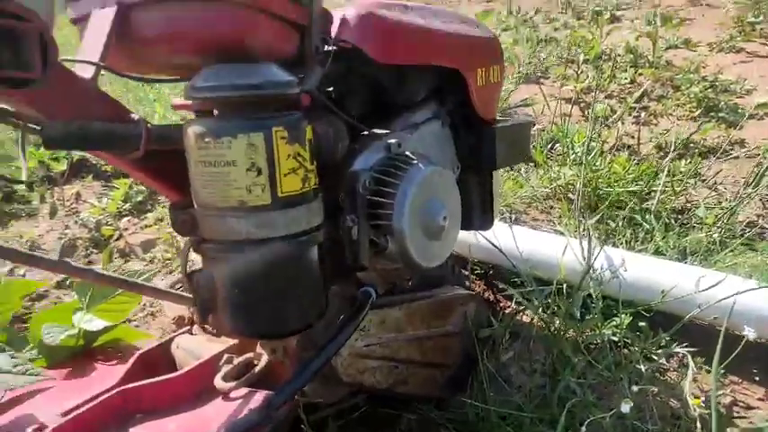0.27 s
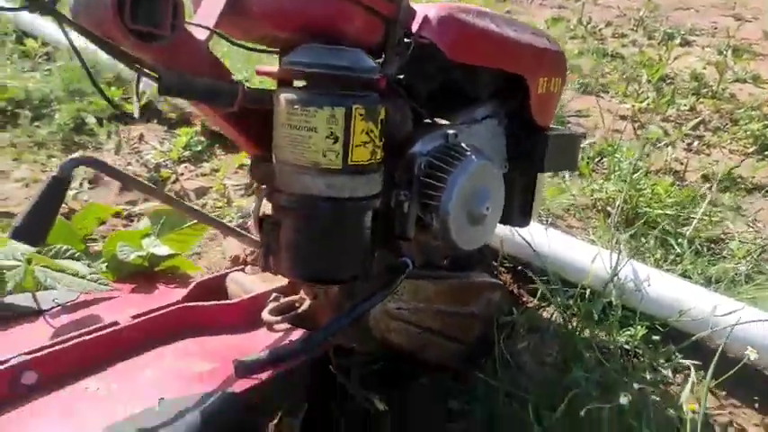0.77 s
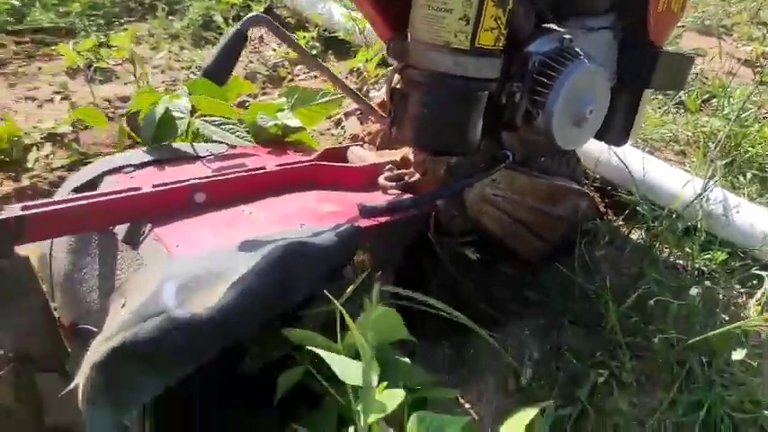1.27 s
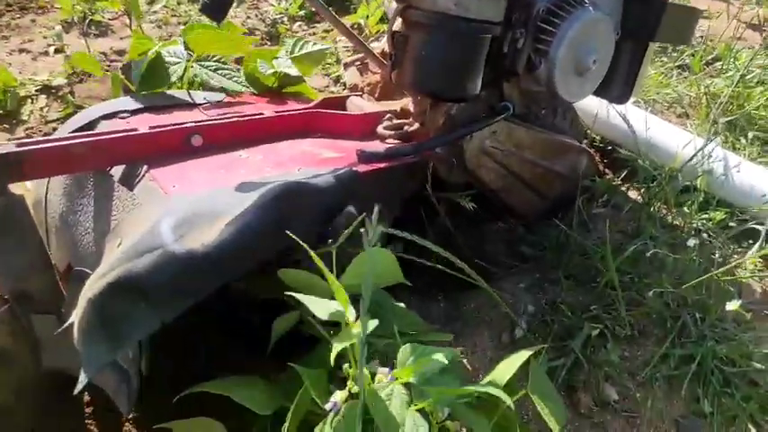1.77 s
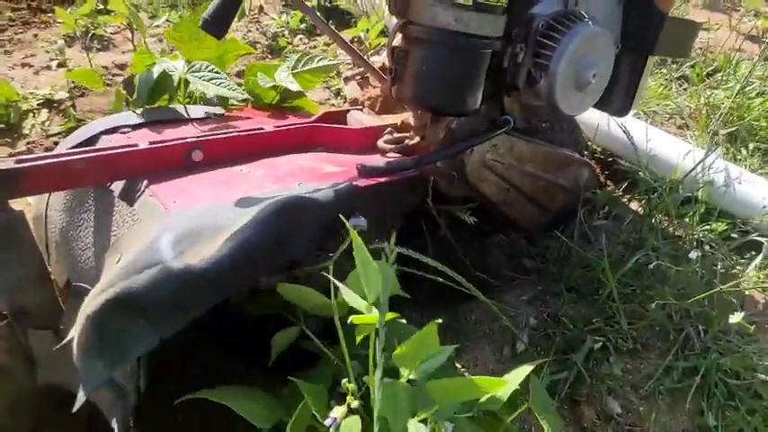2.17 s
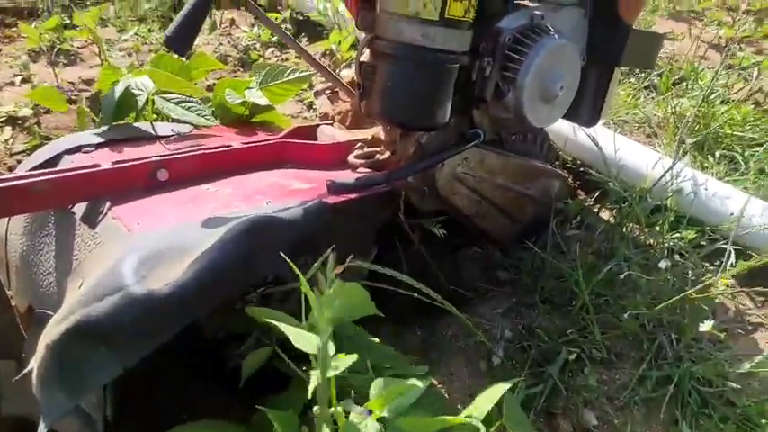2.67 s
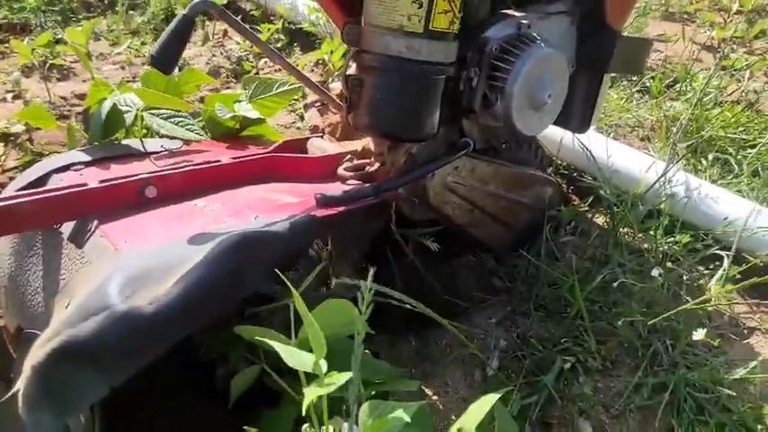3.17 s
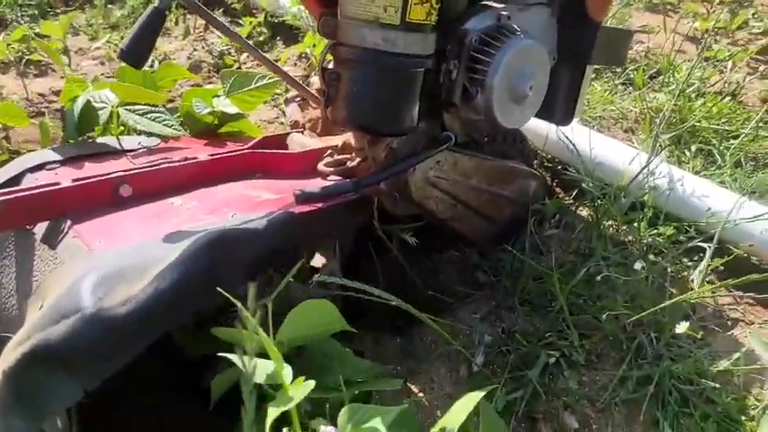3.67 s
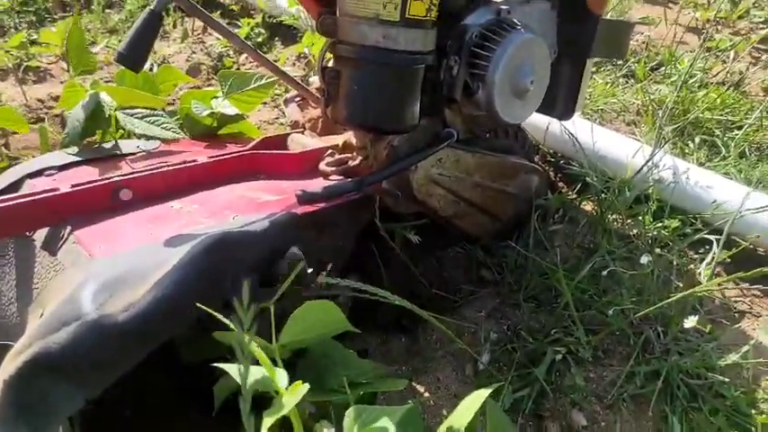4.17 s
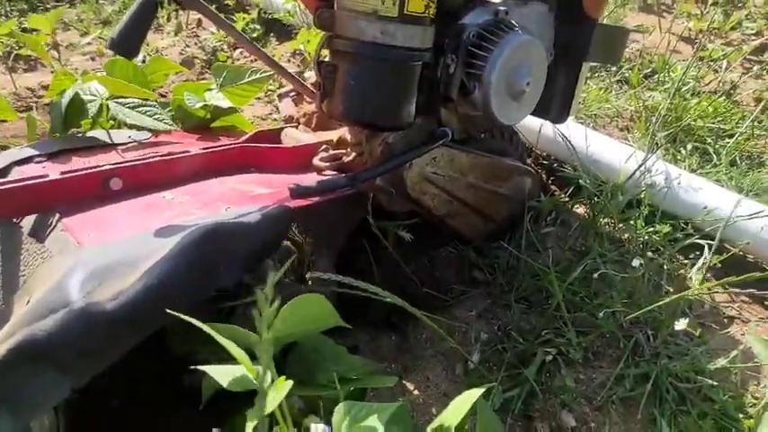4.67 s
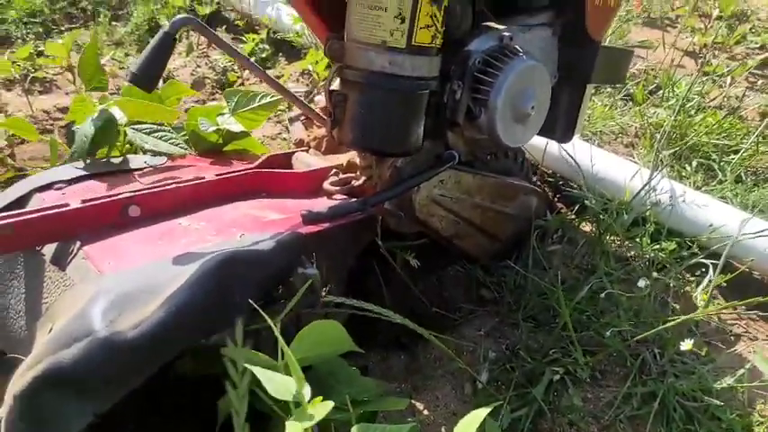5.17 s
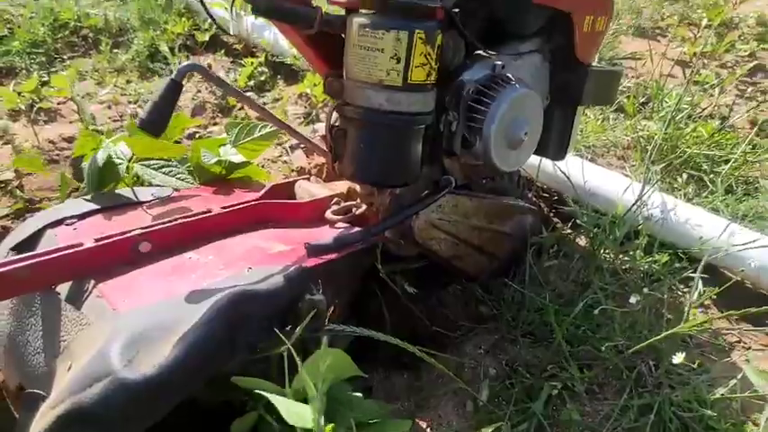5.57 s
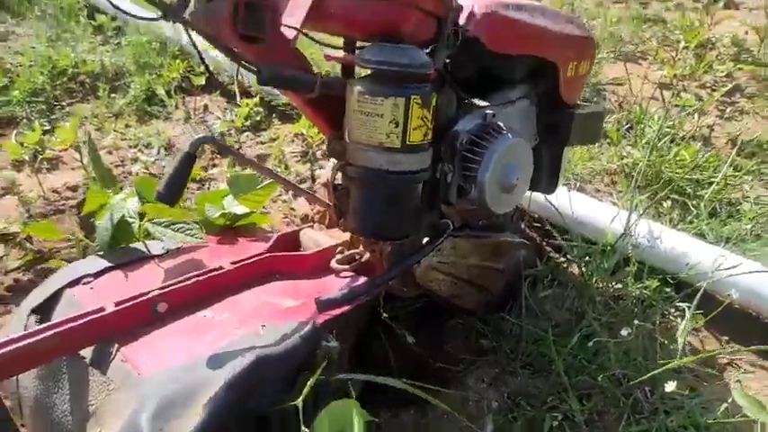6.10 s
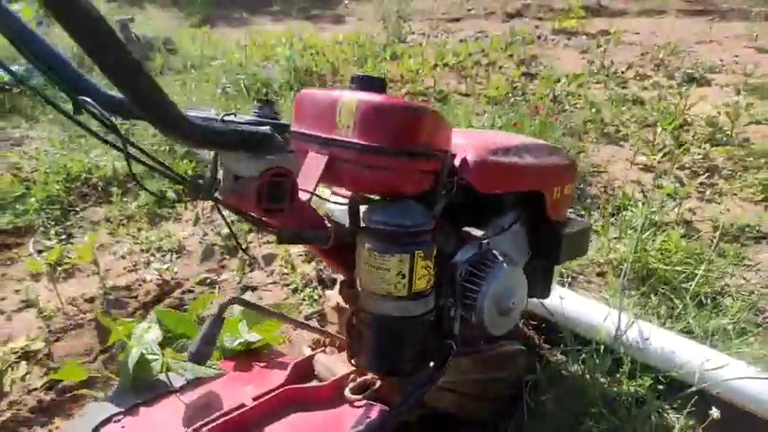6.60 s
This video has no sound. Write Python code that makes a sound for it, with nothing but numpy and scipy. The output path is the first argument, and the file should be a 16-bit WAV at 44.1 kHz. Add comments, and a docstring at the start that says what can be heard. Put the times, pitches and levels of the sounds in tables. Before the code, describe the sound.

Close, dry chatter of a small garden engine with jingling metal covers and low exhaust hum, dropping to a slower idle with distinct knocks.

```python
"""A single-cylinder walk-behind tiller works close by in an open field: filtered noise and struck modes
follow one crankshaft as block knocks, cover jingle and exhaust, over a hum of summed cosines and uneven chuffs.
A sharp metallic clank comes early; near 1.3 s a gust of low noise swells over the breeze, then dies slowly.
Around 4 s the engine slows and the muffler whines in two falling glides of wavering tone.
It then idles with knocks apart, a faint held note, and harder knocks, most cover ticks falling on or near them."""
import sys
import numpy as np
from scipy import signal
from scipy.fft import rfft, irfft, next_fast_len
from scipy.io import wavfile
from scipy.ndimage import uniform_filter1d, minimum_filter1d

SR = 44100
rng = np.random.default_rng(int(sys.argv[2]) if len(sys.argv) > 2 else 0)


def digitize_waveform(pressure):
    """Quantize a signal to 16-bit integers and store it at the path in sys.argv[1].

    Rows of a 2-D input are taken as channels; values are limited to [-1, 1].
    """
    field = np.atleast_2d(pressure).T
    bounded = np.clip(field, -1, 1)
    quanta = np.round(bounded * 32767).astype(np.int16)
    wavfile.write(sys.argv[1], SR, quanta)


N = 301640
TIME = np.arange(N) / SR
SIZE = next_fast_len(N, real=True)
BINS = np.fft.rfftfreq(SIZE, 1 / SR)

# engine speed: time_s, firings_hz
FIRING = [(0.0, 46.47), (0.37, 46.03), (1.27, 46.54), (1.69, 44.77), (2.12, 45.74), (3.24, 44.36),
          (3.92, 41.63), (4.32, 34.91), (4.99, 31.06), (5.43, 31.3), (5.74, 30.89), (6.21, 31.39),
          (6.84, 31.12)]
FAST_HZ, IDLE_HZ = 36.5, 31  # at or above: working; at or below: idling


def crank():
    """Engine cycles since the start, one firing each, and how far the engine has sunk to idle (0-1)."""
    rate_hz, = curves(FIRING)
    cycles = np.cumsum(rate_hz) / SR
    idle = np.clip((FAST_HZ - rate_hz) / (FAST_HZ - IDLE_HZ), 0, 1)
    return cycles, idle


# block colour, relative: freq_hz, work_left_db, work_right_db, idle_left_db, idle_right_db
BLOCK = [(840, -6, -11, -11.5, -19), (930, -2, -6, -3.5, -11.5), (1130, -2.5, -7.5, 0, -9),
         (1280, -4.5, -10.5, -7, -13), (1520, -4, -12, -6, -17), (1680, -5.5, -12.5, -7.5, -19.5),
         (2000, -7, -13, -11, -21), (2450, -10, -14, -14, -22), (2900, -15, -18, -18, -25),
         (3400, -19, -21, -22, -26), (4000, -30, -29, -33, -35), (4500, -28, -28, -33, -33),
         (5000, -29, -26, -33, -31)]


def block(cycles, idle):
    """Slap, combustion knock and rebound ring the block over valve-gear clatter; at idle knocks stand apart."""
    slaps = blows(cycles, peak=-0.08, rise=0.03, decay=0.08, uneven_db=1.5, between=0)
    knocks = blows(cycles, peak=0.11 + 0.05 * idle, rise=0.06, decay=0.27, uneven_db=0.9,
                   between=0.6 - 0.32 * idle)
    rebounds = blows(cycles, peak=0.29 + 0.04 * idle, rise=0.03, decay=0.09, uneven_db=1.5, between=0)
    force = np.sqrt(knocks ** 2 + (0.55 * rebounds) ** 2 + (0.35 * slaps) ** 2)
    # powers of force: ringing follows the blows sharply, clatter and grit more evenly
    ringing = rattle(force ** 1.4, low_hz=950, high_hz=1480, ring_s=0.003, hits_per_s=585, count=8)
    clatter = rattle(force ** 0.72, low_hz=1600, high_hz=4300, ring_s=0.004, hits_per_s=60, count=22)
    grit = force ** 0.68 * rng.standard_normal((2, N)) * amp(1.2 * wander(800))
    drive = grit + amp(3) * ringing + amp(3) * clatter
    return radiate(drive * amp(0.7 * wander(12)), BLOCK, idle, skirt_db=47)


# cover colour, relative: freq_hz, work_left_db, work_right_db, idle_left_db, idle_right_db
COVERS = [(5200, -22, -20, -25, -24), (5800, -22, -14, -25, -23), (6400, -21, -13, -18, -15),
          (6950, -21.5, -14.5, -28.5, -20.5), (7500, -13, -8, -14, -8), (7950, -10.5, -9.5, -11.5, -9.5),
          (8400, -7.5, -11.5, -6.5, -10.5), (9000, -13.5, -18.5, -18.5, -25.5), (9500, -19, -23, -22, -31),
          (10400, -27, -28, -32, -36), (13000, -31, -32, -39, -42), (15300, -37, -37, -50, -50)]


def covers(cycles, idle):
    """Each knock makes thin covers and cooling fins tick, then jingle."""
    ticks = blows(cycles, peak=0.09 + 0.04 * idle, rise=0.012, decay=0.05, uneven_db=3, between=0)
    shakes = blows(cycles, peak=0.09 + 0.05 * idle, rise=0.045, decay=0.36, uneven_db=1.8,
                   between=0.95 - 0.68 * idle)
    jingle = rattle(shakes, low_hz=6200, high_hz=9200, ring_s=0.004, hits_per_s=30, count=22)
    hiss = np.hypot(0.45 * shakes, 0.42 * ticks) * rng.standard_normal((2, N))
    return radiate((hiss + jingle) * amp(1.2 * wander(12)), COVERS, idle, skirt_db=108)


# exhaust colour, relative: freq_hz, work_left_db, work_right_db, idle_left_db, idle_right_db
EXHAUST = [(96, -17.5, -8.5, -17, -17), (166, -10, -11.5, -4.5, -17.5), (237, -9, -10, -4, -6.5),
           (342, -13.5, -14, -16, -16.5), (442, -6, -7.5, -2, -11), (513, -5.5, -8.5, -10.5, -8),
           (563, -7.5, -5, -1.5, -6), (693, -2.5, -12, -4.5, -14), (744, -9.5, -5.5, -15, -8)]


def exhaust(cycles, idle):
    """Gas rushes steadily through the muffler, swelling slightly about four tenths of a cycle after each knock."""
    puffs = blows(cycles, peak=0.53, rise=0.12, decay=0.19, uneven_db=1.5, between=2.6)
    return radiate(puffs * rng.standard_normal((2, N)), EXHAUST, idle, skirt_db=39.5)


# exhaust hum: order (multiple of firing rate), work_db, idle_db
ORDERS = [(1, -42, -54), (2, -40, -44), (3, -36, -39.5), (4, -33.5, -36.5), (5, -47, -35), (6, -45, -45)]
EXHAUST_OPENS_CYCLES = 0.72  # share of the cycle at which the pulse leaves


def hum(cycles, idle):
    """Lowest orders of the exhaust pulses, smeared by the muffler, a little out of step at the two ports."""
    turn = cycles - EXHAUST_OPENS_CYCLES + 0.003 * wander(8)
    tone = 0
    for order, work_db, idle_db in ORDERS:
        level = amp(work_db + idle * (idle_db - work_db) + wander(9))
        skew = np.array([[1], [-1]]) * 0.06 / np.sqrt(order)
        smear = 0.14 * (order - 4) * (order - 5)
        tone = tone + level * np.cos(2 * np.pi * (order * turn + skew - smear))
    return np.sqrt(2) * tone * amp([[0.5], [-0.5]])


# uneven exhaust chuffs: near_s (peak falls at the nearest exhaust opening), relative_db, firings (in a row)
CHUFFS = [(0.142, -25, 1), (0.275, -23, 1), (0.405, -20, 1), (0.535, -18, 2), (0.644, -21, 2),
          (0.776, -24, 1), (0.926, -18, 1), (1.014, -21, 2), (1.119, -28, 1), (1.25, -20, 1),
          (1.504, -19, 1), (1.641, -17, 2), (1.796, -16, 1), (1.909, -16, 2), (1.995, -20, 1),
          (2.106, -16, 2), (2.238, -21, 1), (2.369, -22, 1), (2.456, -20, 1), (2.633, -15.5, 1),
          (2.766, -17, 2), (2.901, -20, 1), (3.079, -18.5, 2), (3.214, -22.5, 2), (3.374, -17, 2),
          (3.511, -15, 1), (3.769, -15, 2), (3.915, -19, 1), (4.035, -15, 3), (4.217, -14, 1),
          (4.417, -12, 1), (4.594, -15, 2), (4.967, -24, 1), (5.418, -27, 1), (5.575, -17, 1),
          (5.706, -13.5, 1), (5.899, -17, 1), (5.996, -18, 1), (6.218, -18, 1), (6.441, -17, 1)]
CHUFF_HALF_WIDTH_S, CHUFF_SAG_HZ_PER_S = 0.0105, 1900
CHUFF_WORK_HZ, CHUFF_IDLE_HZ = 193, 168  # pitch at the peak


def chuffs(cycles, idle, offset_db=-5):
    """Some firings gulp more gas and boom in the muffler as the valve opens, sinking in pitch, lower at idle."""
    out = np.zeros(N)
    offsets = np.arange(-SR // 40, SR // 40)
    age_s = offsets / SR
    envelope = np.exp(-(age_s / CHUFF_HALF_WIDTH_S) ** 2)
    for near_s, relative_db, firings in CHUFFS:
        at = round(near_s * SR)
        peak_hz = CHUFF_WORK_HZ + idle[at] * (CHUFF_IDLE_HZ - CHUFF_WORK_HZ)
        turns = (peak_hz - CHUFF_SAG_HZ_PER_S * age_s / 2) * age_s
        boom = amp(relative_db + offset_db) * envelope * np.cos(2 * np.pi * turns)
        first = np.round(cycles[at] - EXHAUST_OPENS_CYCLES) + EXHAUST_OPENS_CYCLES  # nearest opening
        for k in range(round(firings)):
            out[np.searchsorted(cycles, first + k) + offsets] += boom
    return out * amp([[0.7], [-0.7]])


# muffler whines, two falling glides and a held note; one path each of: time_s, pitch_hz, relative_db
WHINES = [
    [(3.55, 668, -48), (3.61, 650, -27), (3.72, 615, -30), (3.82, 590, -26.5), (3.88, 550, -25),
     (3.95, 530, -48)],
    [(3.9, 600, -48), (3.96, 608, -27), (4.02, 612, -25), (4.07, 568, -22), (4.13, 550, -27),
     (4.2, 540, -24.5), (4.28, 560, -30), (4.4, 555, -48)],
    [(4.4, 550, -42), (4.55, 560, -35), (5.2, 563, -44), (5.4, 567, -32), (6.2, 565, -32), (6.45, 563, -42),
     (6.84, 563, -44)],
]


def whine(cycles, path):
    """A rough, wavering tone near the muffler's resonance, throbbing once a cycle."""
    pitch_hz, relative_db = curves(path)
    inside = 1.0 * (TIME > path[0][0]) * (TIME < path[-1][0])
    sounding = uniform_filter1d(inside, SR // 100)
    throb = 1 + 0.6 * np.cos(2 * np.pi * (cycles - EXHAUST_OPENS_CYCLES))
    tone = np.cos(2 * np.pi * np.cumsum(pitch_hz + 5 * wander(40)) / SR) * throb
    return unit(tone) * sounding * amp(relative_db - 1 + 2.5 * wander(22)) * amp([[1], [-1]])


# sharp metallic ticks and clanks from the covers, at idle mostly on or near harder knocks: start_s, relative_db
CLANKS = [(0.3336, -7), (2.7117, -11.5), (4.882, -14), (4.9447, -17), (5.009, -21), (5.137, -12),
          (5.331, -26), (5.619, -20), (5.651, -19), (6.038, -16.5), (6.069, -21), (6.103, -25),
          (6.1345, -23), (6.581, -19), (6.677, -26), (6.7417, -21)]


def cover_clanks():
    """Sharp blows ring the covers; each is a burst of decaying noise in their idle colour."""
    return strikes(CLANKS, COVERS, decay_s=0.011, offset_db=-6)


# firings that knock harder at idle: start_s, relative_db
KNOCKS = [(4.882, -8), (4.914, -16), (5.011, -22), (5.364, -7), (5.423, -4), (5.556, -17), (5.846, -4),
          (6.037, -15), (6.134, -4.5), (6.198, -19), (6.742, -18)]


def hard_knocks():
    """Some idle firings hit the block harder; each adds decaying noise in its colour."""
    return strikes(KNOCKS, BLOCK, decay_s=0.008, offset_db=-7.5)


# wind spectrum, relative: freq_hz, level_db
WIND = [(15, 11), (30, 12.5), (55, 11), (90, 9.5), (140, -1)]
BREEZE_DB, GUST_DB = -41.5, -28
GUST_PEAK_S, GUST_RISE_S, GUST_FALL_S = 1.27, 0.14, 1


def wind():
    """Turbulent rumble at the microphone ports, swelling with the gust."""
    rumble = colour(spread(rng.standard_normal((2, N))), spectra(WIND, skirt_db=10.5))
    age_s = TIME - GUST_PEAK_S
    gust = np.exp(-abs(age_s) / np.where(age_s < 0, GUST_RISE_S, GUST_FALL_S))
    level = np.hypot(amp(BREEZE_DB), amp(GUST_DB) * gust)
    return unit(rumble) * level * amp([[-1], [1]])


def blows(cycles, peak, rise, decay, uneven_db, between):
    """One burst a cycle of random strength, quick rise, slow decay, over steady clatter; times in cycles."""
    turn = cycles - peak + 1 + 0.01 * wander(21)
    number = np.floor(turn + 2 * rise).astype(int)
    age = turn - number
    shape = np.exp(-np.where(age < 0, (age / rise) ** 2, age / decay))
    strength = amp(uneven_db * np.clip(rng.standard_normal(400), -2, 2))
    return np.hypot(between, strength[number] * shape)


def rattle(force, low_hz, high_hz, ring_s, hits_per_s, count):
    """Separate hits, each ringing one of many close modes; as dense per Hz as white noise."""
    out = np.zeros((2, N))
    age_s = np.arange(1024) / SR
    for channel in out:
        for centre_hz in np.linspace(low_hz, high_hz, count):
            at = rng.integers(0, N, int(hits_per_s * N / SR))
            hits = np.bincount(at, force[at], N)
            mode_hz = centre_hz + 25 * rng.standard_normal()
            mode = np.sin(2 * np.pi * mode_hz * age_s) * np.exp(-age_s / ring_s)
            channel += signal.oaconvolve(hits, np.diff(mode))[:N]
    return out / out.std() * np.sqrt(np.mean(force ** 2) * (high_hz - low_hz) / (SR / 2))


def strikes(rows, part, decay_s, offset_db):
    """Single hard blows on a part, each chattering for a few milliseconds."""
    hits = np.zeros(N)
    for start_s, relative_db in rows:
        hits[round(start_s * SR)] = amp(relative_db + offset_db)
    chatter = signal.lfilter([1], [1, -np.exp(-1 / (decay_s * SR))], hits)
    idle_db = spectra(part, skirt_db=32)[2:]
    noise = rng.standard_normal((2, N))
    return colour(noise * chatter, idle_db) / colour(noise, idle_db).mean(0).std()


# resonances of muffler, block, fins and covers, and hollows between: freq_hz, width_hz, work_lift_db, idle_lift_db
RINGS = [(561, 26, 4.5, 3), (938, 45, 2, 2), (1790, 100, 2, 2), (2320, 130, -2, -3), (2580, 130, 2, 2),
         (3030, 110, -3, 0), (3230, 90, 0, -4), (3340, 120, 3, 0), (3765, 110, 1, 3), (4050, 80, -4, -4),
         (4230, 100, 3, 4), (4760, 80, 4, 1), (5007, 80, 5, 2), (6550, 250, 2, 2), (7080, 180, -2, -5),
         (7330, 110, 1, 4), (7563, 80, 3, 5), (7980, 160, -1, -4), (8230, 110, 2, 4), (8380, 110, 3, 3),
         (8660, 130, 3, 4), (8890, 130, -4, -9), (9080, 120, 5, 7)]


def radiate(drive, table, idle, skirt_db):
    """Drives a part's resonances, fading from work to idle colour; level held near 1 over a third of a second."""
    rings_db = 0
    for freq_hz, width_hz, *lifts_db in RINGS:
        bell = 1 / (1 + (2 * (BINS - freq_hz) / width_hz) ** 2)
        rings_db = rings_db + np.outer(lifts_db, bell)
    gains_db = spectra(table, skirt_db) + rings_db.repeat(2, axis=0)  # left and right share the rings
    pair = spread(drive)
    working, idling = np.split(colour(np.vstack([pair, pair]), gains_db), 2)
    sound = (1 - idle) * unit(working) + idle * unit(idling)
    return sound / np.sqrt(uniform_filter1d(sound.mean(0) ** 2, SR // 3) + 1e-12)


# stereo likeness: freq_hz, likeness (1 = same in both channels)
LIKENESS = [(30, 0.3), (90, 0.85), (250, 0.87), (600, 0.95), (1100, 0.8), (2000, 0.3), (4000, 0),
            (12000, 0)]


def spread(pair):
    """Makes two unrelated signals alike in the bass, as two close ports hear them."""
    same = np.clip(spectra(LIKENESS, skirt_db=0.5)[0], -1, 1)
    left, right = rfft(pair, SIZE)
    return irfft(np.array([left, same * left + np.sqrt(1 - same ** 2) * right]), SIZE)[:, :N]


def colour(x, db):
    """Filters each channel by its gain; all share one causal phase, so resonances ring after a blow."""
    log_gain = np.log(amp(np.maximum(db, -90)))
    fold = np.sign(SIZE / 2 - np.arange(SIZE))
    phase = rfft(irfft(log_gain.mean(0), SIZE) * fold).imag
    return irfft(rfft(x, SIZE) * np.exp(log_gain + 1j * phase), SIZE)[:, :N]


def spectra(table, skirt_db):
    """Table columns per bin, interpolated over octaves, falling by skirt_db an octave past the ends."""
    hz, *columns = np.transpose(table)
    octave, points = np.log2(BINS + 1), np.log2(hz)
    outside = abs(octave - np.clip(octave, points[0], points[-1]))
    return np.array([np.interp(octave, points, c) - skirt_db * outside for c in columns])


def curves(table):
    """Each column of a time table, sample by sample."""
    s, *columns = np.transpose(table)
    return [np.interp(TIME, s, c) for c in columns]


def wander(hz):
    """Random motion of rms 1, slower than about hz."""
    return unit(irfft(rfft(rng.standard_normal(SIZE)) * np.exp(-(BINS / hz) ** 2), SIZE)[:N])


def unit(x):
    """Scales a sound so that the mean of its channels has rms 1."""
    return x / np.sqrt(np.mean(np.atleast_2d(x).mean(0) ** 2) + 1e-20)


def amp(db):
    """Decibels to gain."""
    return 10 ** (np.asarray(db) / 20)


# level change as the microphone moves round the machine: time_s, exhaust_db, block_db, covers_db
VIEWPOINT = [(0.0, 1, 0.3, 6), (1.3, 0, 0.5, 2.5), (3.8, -1.6, 0.23, 2.5), (5.9, -0.2, -1.75, -1.5),
             (6.84, -2, -2, 1.2)]
WORK_DB, IDLE_DB = (-22.5, -17.45, -27.5), (-26, -17.45, -26)  # exhaust, block, covers, before VIEWPOINT


def part_gains(idle):
    """Gains of exhaust, block and covers from engine speed and microphone position."""
    return amp(np.outer(WORK_DB, 1 - idle) + np.outer(IDLE_DB, idle) + curves(VIEWPOINT))


def scene():
    """Engine parts follow one crankshaft, with wind beneath; the open field returns no echo."""
    cycles, idle = crank()
    exhaust_gain, block_gain, covers_gain = part_gains(idle)
    metal = block_gain * block(cycles, idle) + covers_gain * covers(cycles, idle)
    gas = exhaust_gain * exhaust(cycles, idle) + hum(cycles, idle) + chuffs(cycles, idle)
    whines = sum(whine(cycles, path) for path in WHINES)
    return metal + gas + whines + cover_clanks() + hard_knocks() + wind()


EDGE_HZ = 15750


def record(dry):
    """A fast limiter holds peaks to full scale, then a low-pass sets the band limit."""
    needed = 1 / np.maximum(abs(dry).max(0), 1)
    gain = uniform_filter1d(minimum_filter1d(needed, size=65), size=65)
    lowpass = signal.firwin(511, EDGE_HZ, window=("kaiser", 9), fs=SR)
    return signal.oaconvolve(dry * gain, lowpass[None], "same")


dry = scene()
out = record(dry)
digitize_waveform(out)
```